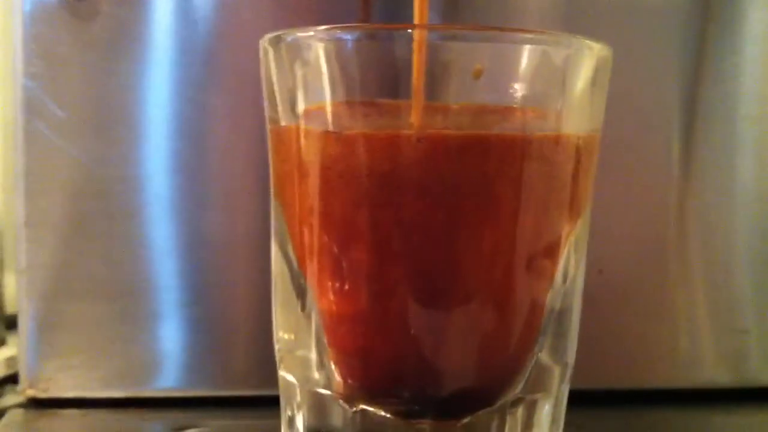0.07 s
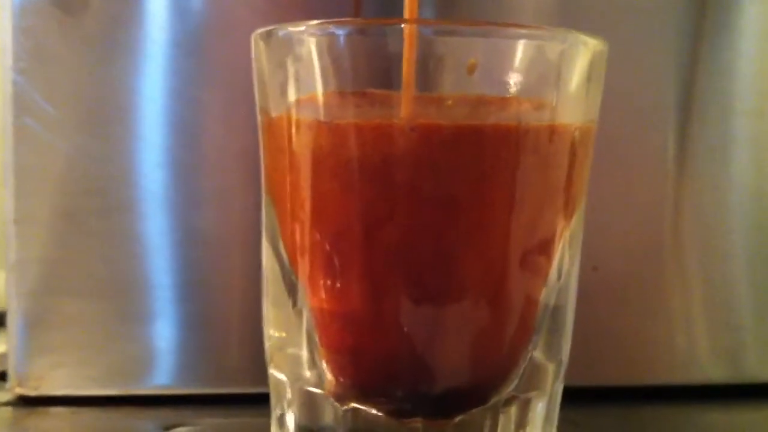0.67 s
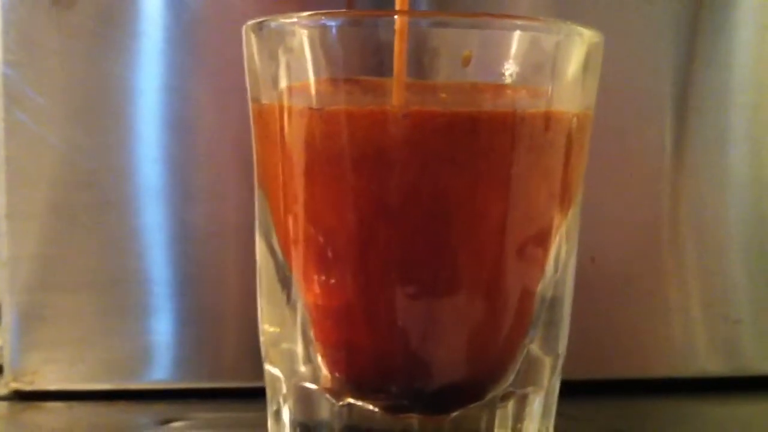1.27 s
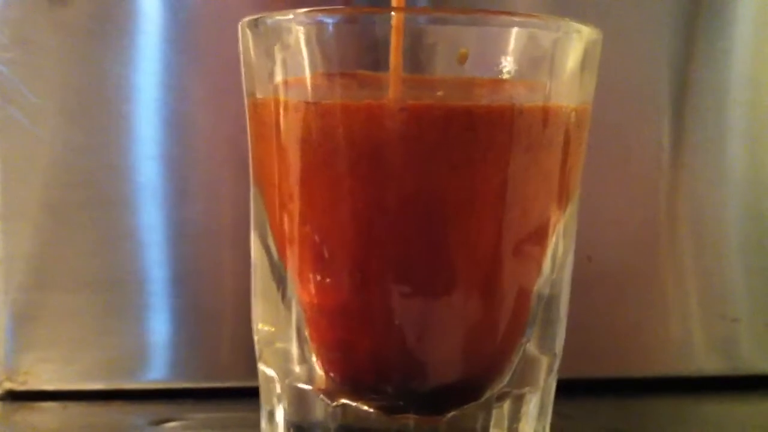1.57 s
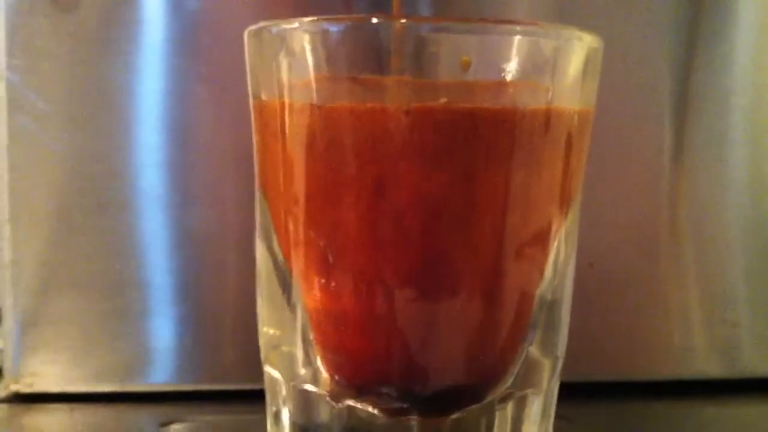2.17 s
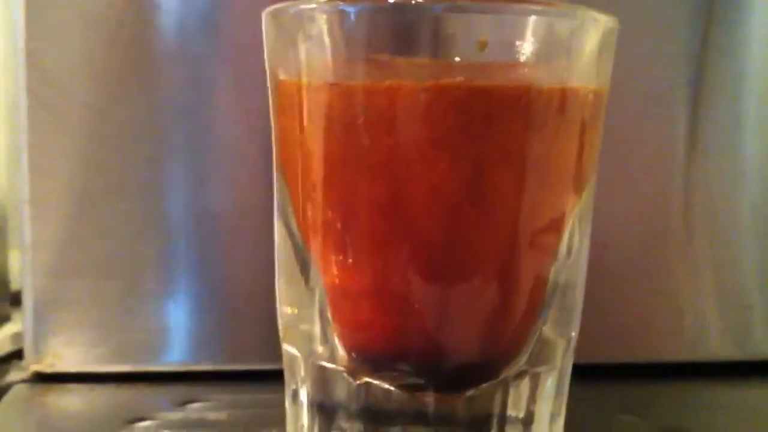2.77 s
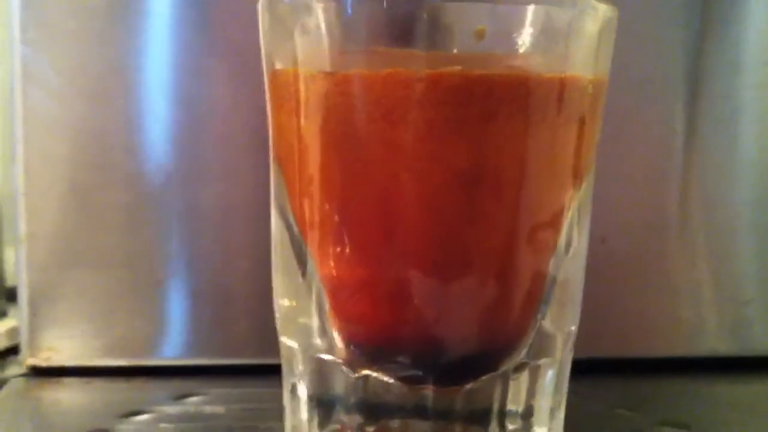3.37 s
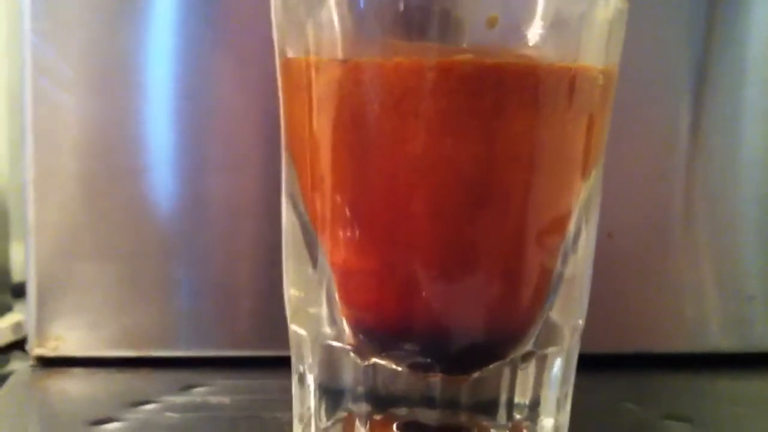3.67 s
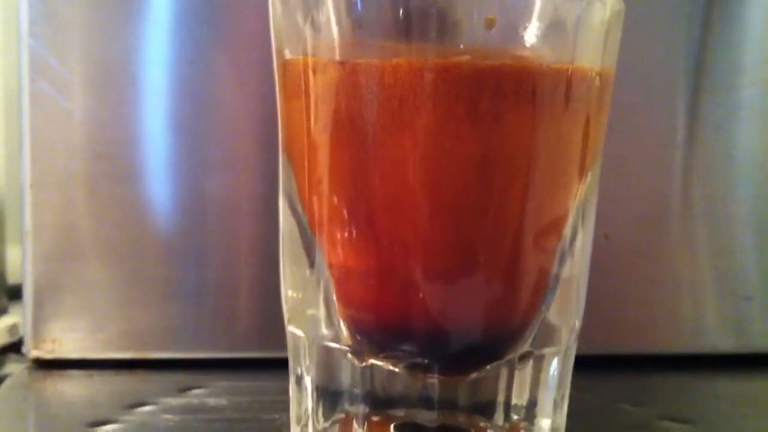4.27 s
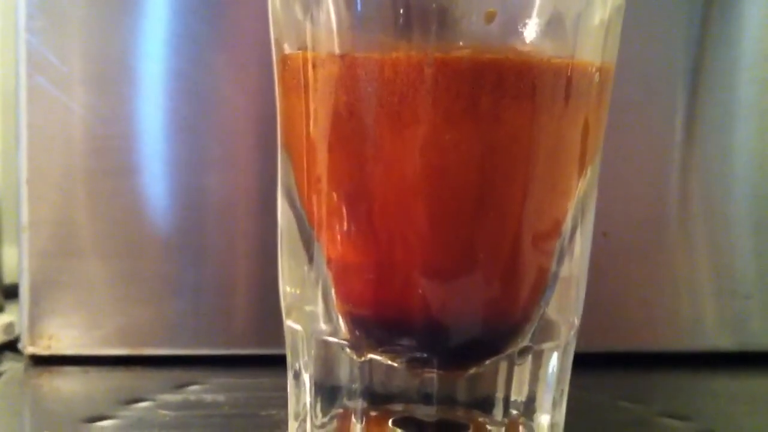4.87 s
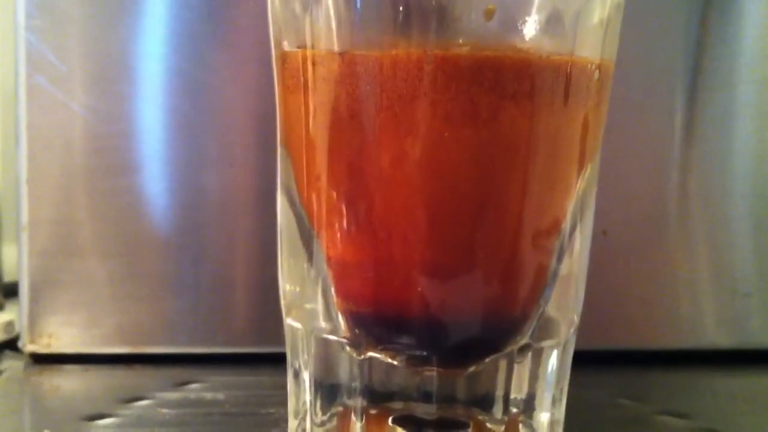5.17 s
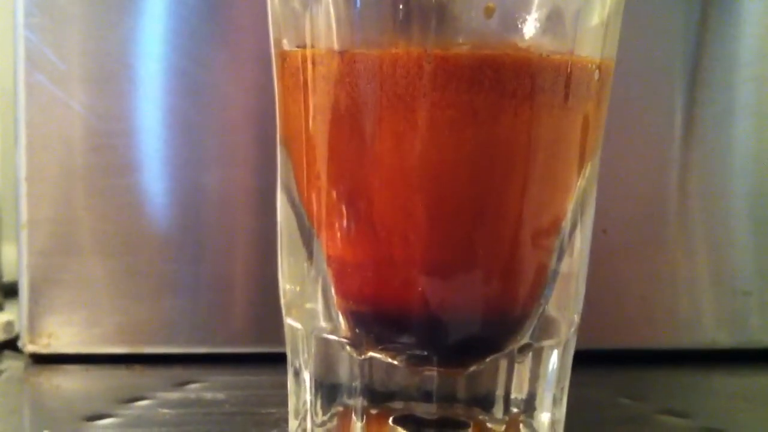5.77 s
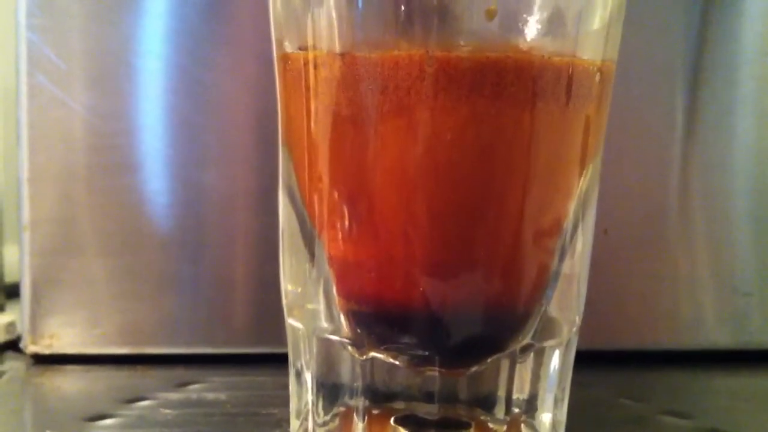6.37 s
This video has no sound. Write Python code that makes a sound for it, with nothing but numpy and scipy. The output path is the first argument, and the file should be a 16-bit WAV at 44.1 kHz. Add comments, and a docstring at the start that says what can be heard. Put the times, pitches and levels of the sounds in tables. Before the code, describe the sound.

An espresso machine pump hums and rattles loudly, then clunks off, leaving a thin hiss and a quiet kitchen drone.

```python
"""A loud, rattling hum comes first: an espresso machine's vibrating pump is filling a glass.
Its piston strokes at the mains rate, shaking the casing and loose parts and pushing water along.
The pump is switched off and a valve slams with a hard clunk. The trapped pressure hisses away and
spits once, and the resting machine gives a soft thump and a few ticks.
The small kitchen echoes the knocks, and an appliance drones quietly in it throughout."""
import sys
import numpy as np
from scipy import signal
from scipy.fft import rfft, irfft, next_fast_len
from scipy.io import wavfile
from scipy.ndimage import map_coordinates

SR = 44100
rng = np.random.default_rng(int(sys.argv[2]) if len(sys.argv) > 2 else 0)


def transcribe(u):
    """Save the signal u as a 16-bit wav file named by the first command-line argument.

    u: samples, shape (n,) or (channels, n), limited to [-1, 1]; the rate is SR.
    q: integer samples, one column per channel.
    """
    v = np.clip(np.atleast_2d(u).T, -1, 1)
    q = np.round(v * 32767).astype(np.int16)
    wavfile.write(sys.argv[1], SR, q)


N = 287091
T = np.arange(N) / SR
BLOW_T = T[:SR // 2]  # half a second, enough for one blow to ring

# A ring_s is the time to fade by 60 dB. A noise's shape_db only sets its colour, not its loudness.
# The kitchen's echo: pitch_hz, ring_s
ROOM_ECHO = [(100, .45), (400, .5), (1000, .42), (2500, .42), (4000, 0.34), (15000, 0.18)]
# The appliance's motor tones: pitch_hz, level_db
MOTOR_TONES = [(119.8, -74.5), (204, -78), (223, -68.5), (239.7, -59), (294.3, -72.5), (353.7, -76),
               (411.8, -76), (471.7, -68), (707.5, -77.5), (825.5, -78.5)]
# The air it moves: pitch_hz, shape_db
AIR_RUSH = [(25, -23), (80, -25.5), (140, -11), (190, -9.5), (210, 1.5), (260, -2), (330, -4.5), (470, 0.5),
            (560, -10), (780, -6.5), (950, -13.5), (1300, -15.5), (2000, -21.5), (8000, -27)]
# The resting machine's ticks: start_s, strength_db, brightness_db
TICK_TIMES = [(4.367, -53, -13), (4.457, -50, -19), (4.4944, -57, -12), (4.9182, -51.5, -9),
              (4.9796, -55, -14), (6.0045, -53, -1)]
# The tones in a tick: pitch_hz, strength_db, ring_s
TICK_TONES = [(1327, -4, .06), (1470, 1, 0.034), (1600, -1.5, 0.041)]
# The crack in a tick: pitch_hz, shape_db
TICK_NOISE = [(800, -20), (1500, -12), (2800, 14), (5000, -12), (16000, -22)]
# Leaking pressure: pitch_hz, shape_db
LEAK_HISS = [(600, -22), (1500, -10.5), (3000, -0.5), (4400, -4), (6000, 0.5), (8200, -3), (9400, 1),
             (11500, 1.5), (13000, -1.5), (14300, 2), (16000, -3.5)]
# A narrower sizzle: pitch_hz, shape_db
JET_SIZZLE = [(2000, -25), (5000, -13.5), (6000, 3.5), (7000, -7), (8300, -13.5), (9300, 4), (11000, -7),
              (12400, 2), (14000, -5), (16000, -6.5)]
# The vent's one spit: pitch_hz, shape_db
VENT_SPIT = [(800, -18), (1400, -7), (3000, -14), (7000, -3), (11000, 1), (13000, 4), (16000, -1)]
# A lower rush that builds just ahead of it: pitch_hz, shape_db
VENT_SWELL = [(800, -16), (1500, -4), (2800, -1), (5000, -1.5), (9000, -10)]
# The valve's slam and bounces: start_s, strength_db
VALVE_BLOWS = [(1.8172, -13), (1.8200, -16), (1.8250, -12.5), (1.8300, -20.5), (1.8372, -20)]
# A blow's bright part: pitch_hz, shape_db
VALVE_SNAP = [(300, -22), (1000, -10), (3500, -1.5), (5000, -1.5), (7700, -2), (9200, 4), (10400, -6),
              (12900, -5), (13900, 4), (14800, -3), (16000, -3.5)]
# A blow's dull part: pitch_hz, shape_db
VALVE_KNOCK = [(30, -20), (100, -21.5), (300, -5), (740, -1), (1220, -6.5), (1420, 7), (1850, -6.5),
               (2550, 7), (3200, -10), (3800, -7.5), (4500, -12), (16000, -34)]
# The struck casing's tones: pitch_hz, strength_db, ring_s
CASING_TONES = [(415, -22, .2), (673, -19, .12), (764, -17, .1), (1010, -12, .05), (1360, -10, .03),
                (1432, -5, .03), (1560, -9, .025), (1927, -11, .04), (2300, -9, .03), (2476, -12, .03),
                (2589, -12, .03), (2850, -11, .03), (3500, -7, .02), (3750, -7, .02)]
# The pump's hum: multiple_of_mains, level_db
PUMP_HUM = [(1, -74), (2, -59), (3, -39.5), (4, -50.5), (5, -44), (6, -47.5), (7, -35.5), (8, -55),
            (9, -51.5), (10, -50), (11, -51.5), (12, -50.5), (13, -56.5), (14, -61), (15, -58.5), (16, -48),
            (17, -54), (18, -48), (19, -49.5), (20, -46.5), (21, -68.5), (22, -56.5), (23, -63.5),
            (24, -53), (25, -57.5), (26, -55), (27, -59), (28, -56), (29, -71.5), (30, -72.5)]
# The casing's buzz above the hum, before the panels boost it: pitch_hz, level_db
CASING_BUZZ = [(1860, -58.5), (2220, -68), (2340, -49.5), (2520, -58.5), (2590, -79), (2700, -60.5),
               (2860, -92), (2940, -58.5), (3020, -83), (4000, -78), (5000, -80.5), (5800, -84.5),
               (6700, -69.5), (7600, -78.5), (16000, -87)]
# Ringing sheet metal panels: pitch_hz, boost_db
PANEL_BOOSTS = [(3240, 20), (3720, 4), (3900, 15.5), (4320, 10.5), (4620, 4.5), (4900, 8), (5040, 18),
                (6720, 10)]
# Water forced through the machine: pitch_hz, shape_db
WATER_FLOW = [(30, -43), (100, -30), (170, -21), (240, -16.5), (290, -6.5), (420, -12), (520, -9.5),
              (800, -20), (1000, -11), (1700, -22), (2300, -12.5), (2800, -21.5), (5800, -26.5),
              (16000, -32)]
# Loose metal parts: pitch_hz, shape_db
METAL_RATTLE = [(4000, -35), (5900, -20.5), (6400, -2), (6720, 5), (6830, -5), (7150, 3), (7500, 0),
                (7750, -1), (9000, -4), (11000, -6.5), (12300, -16.5), (13750, -9), (14200, -14.5),
                (16000, -17.5)]

MAINS_HZ, TOP_HZ = 59.992, 15850  # the piston's stroke rate; the highest pitch heard
STOP_S, THUMP_S, SPIT_S = 1.818, 2.4403, 2.82


def amp(db):
    """Turn decibels into a gain."""
    return 10 ** (np.asarray(db) / 20)


def unit(x):
    """Scale a signal to an average (rms) level of 1."""
    return x / np.sqrt(np.mean(x ** 2) + 1e-20)


def along(points, hz):
    """Read between a table's rows on a log pitch scale."""
    pitches, values = np.transpose(points)
    return np.interp(np.log(hz + 1), np.log(pitches + 1), values)


def wobble(per_s):
    """A smooth curve through per_s random values a second."""
    return map_coordinates(rng.standard_normal(int(N * per_s / SR) + 4), [T * per_s])


def filtered(x, response):
    """Turn each frequency up or down by response(hz)."""
    size = next_fast_len(N + SR // 2)
    return irfft(rfft(x, size) * response(np.fft.rfftfreq(size, 1 / SR)), size)[:N]


def noise(shape):
    """Noise at level 1, coloured by a table."""
    return unit(filtered(rng.standard_normal(N), lambda hz: amp(along(shape, hz))))


def decay(t, ring_s):
    """Silent before t = 0, then 60 dB quieter every ring_s."""
    return (t >= 0) * np.exp(-np.log(1000) * np.maximum(t, 0) / ring_s)


def fade_in(t, rise_s):
    """Climb from 0 toward 1 to soften a start."""
    return 1 - np.exp(-t / rise_s)


def add(track, start_s, sound):
    """Mix a sound into a track at start_s."""
    part = track[round(start_s * SR):][:len(sound)]
    part += sound[:len(part)]


def ring(tones, scatter_db):
    """A struck part rings with fading tones, their strengths new at each blow."""
    hz, db, ring_s = np.transpose(tones)[:, :, None]
    strength = amp(db + scatter_db * rng.standard_normal(hz.shape)) * rng.choice([-1, 1], hz.shape)
    return np.sum(strength * np.sin(2 * np.pi * hz * BLOW_T) * decay(BLOW_T, ring_s), axis=0)


def kitchen_echo(x):
    """The room answers a sound, each frequency dying at its own speed."""
    hz, t, spectrum = signal.stft(rng.standard_normal(SR), SR, nperseg=256)
    tail = signal.istft(spectrum * decay(t, along(ROOM_ECHO, hz)[:, None]), SR, nperseg=256)[1]
    tail *= fade_in(T[:len(tail)], .008)
    return signal.fftconvolve(x, tail / np.linalg.norm(tail))[:N]


def appliance():
    """A motor's slightly unsteady tones sit over the rush of its air."""
    tones = np.zeros(N)
    for hz, db in MOTOR_TONES:
        gain = np.sqrt(2) * amp(db + 1.7 * wobble(3))
        phase = .14 * wobble(1.923) + rng.uniform(0, 2 * np.pi)
        tones += gain * np.sin(2 * np.pi * hz * T + phase)
    return tones + amp(-60.5 + .6 * wobble(4.6)) * noise(AIR_RUSH)


def settling(thump_hz=276):
    """The resting machine gives one soft, low thump and a few small ticks."""
    knocks = np.zeros(N)
    thump = -amp(-20.5) * np.sin(2 * np.pi * thump_hz * BLOW_T) * decay(BLOW_T, ring_s=.016)
    add(knocks, THUMP_S, thump * fade_in(BLOW_T, .0031))
    crack = noise(TICK_NOISE)
    for start_s, db, bright_db in TICK_TIMES:
        add(knocks, start_s, amp(db - 6) * ring(TICK_TONES, scatter_db=3.5) * fade_in(BLOW_T, .0006))
        knocks += amp(db + bright_db - 5.5) * crack * decay(T - start_s, ring_s=.037)
    return knocks + amp(-10) * kitchen_echo(knocks)


def vent(leak_fall_db_per_s=2.5, jet_fall_db_per_s=5):
    """Trapped pressure leaks away as a thin hiss that swells and spits once."""
    since_stop = T - STOP_S
    leak = amp(-58 - leak_fall_db_per_s * since_stop + .3 * wobble(16)) * noise(LEAK_HISS)
    # the jet needs high pressure, so it dies sooner
    jet = amp(-60 - jet_fall_db_per_s * since_stop + .8 * wobble(2.7)) * noise(JET_SIZZLE)
    spit = amp(-51.5) * np.exp(-abs(T - SPIT_S) / .038) * noise(VENT_SPIT)
    swell = amp(-61.5) * np.exp(-abs(T - SPIT_S + .05) / .19) * noise(VENT_SWELL)
    return (leak + jet + spit + swell) * (since_stop > 0)


def valve_clunk(dulling_db=8):
    """The valve's plunger slides, slams and bounces, duller each time, and the casing rings."""
    casing = np.zeros(N)
    slam_s = VALVE_BLOWS[0][0]
    blows = amp(-16.5) * noise(VALVE_SNAP) * decay(slam_s - T, .017)  # a scrape grows into the slam
    for bounce, (start_s, db) in enumerate(VALVE_BLOWS):
        snap_db = .5 - dulling_db * np.sqrt(bounce)
        snap = amp(snap_db) * noise(VALVE_SNAP) * decay(T - start_s, ring_s=.018)
        knock = amp(-3) * noise(VALVE_KNOCK) * decay(T - start_s, ring_s=.038)
        blows += amp(db) * (snap + knock)
        add(casing, start_s, amp(db - 5) * ring(CASING_TONES, scatter_db=1) * fade_in(BLOW_T, .0003))
    return blows + casing + amp(-15) * kitchen_echo(blows)


def piston(size=4096):
    """Repeating strokes hum and buzz at multiples of the mains rate; the lowest ring on longest."""
    multiple = np.arange(1, int(TOP_HZ / MAINS_HZ))
    hz = multiple * MAINS_HZ
    # the panels favour some tones over others
    ripple_db = 2 * rng.standard_normal(len(hz)) * (hz > 3000)
    ripple_db += sum(boost * (abs(hz - pitch) < MAINS_HZ / 2) for pitch, boost in PANEL_BOOSTS)
    db = along(CASING_BUZZ, hz) + ripple_db
    db[:len(PUMP_HUM)] = np.transpose(PUMP_HUM)[1]
    cycle = np.arange(size) / size

    def bouncing(life_s):
        """A stroke bounces briefly around the casing, which sets each tone's phase."""
        return rfft(rng.standard_normal(size) * np.exp(-cycle / MAINS_HZ / life_s))[multiple]

    def repeat(tones):
        """Build one stroke from its tones and loop it."""
        stroke = irfft(np.append(0, tones), size) * size / 2
        return np.interp(T * MAINS_HZ % 1, cycle, stroke, period=1)

    soft_push = bouncing(.008)
    end_stop = bouncing(.003) * np.exp(2j * np.pi * hz * .003)  # a sharp hit, 3 ms before the push
    bounces = np.where(hz < 1800, soft_push, end_stop)
    tones = np.sqrt(2) * amp(db) * bounces / abs(bounces)
    since_stop = np.maximum(T - STOP_S, 0)
    low = multiple <= len(PUMP_HUM) // 4
    hum = repeat(tones * low) * decay(since_stop, ring_s=.36)
    buzz = repeat(tones * ~low) * decay(since_stop, ring_s=.09)
    return hum + buzz


def pump(flow_db=-43, rattle_db=-49, shake_db=3.5):
    """Each stroke drives the casing, pushes water and shakes loose parts by a different amount."""
    hum = piston() * amp(.2 * wobble(25))
    stroke_number, since_stroke = np.divmod(T + .003, 1 / MAINS_HZ)
    push = np.exp(-since_stroke / .008) * fade_in(since_stroke, .002)
    shakes = amp(shake_db * rng.standard_normal(int(stroke_number[-1]) + 1))
    jolt = push * shakes[stroke_number.astype(int)]
    flow = amp(flow_db) * noise(WATER_FLOW) * unit(1 + push)
    rattle = amp(rattle_db) * noise(METAL_RATTLE) * unit(.25 + jolt) * amp(.5 * wobble(6))
    return hum + (flow + rattle) * decay(np.maximum(T - STOP_S, 0), ring_s=.24)


def scene():
    """The machine and the appliance together, in one channel."""
    return (pump() + valve_clunk() + vent() + settling() + appliance())[None]


def record(dry, bass_hz=55):
    """Soften the deep bass and cut off the very highest treble."""
    return filtered(dry[0], lambda hz: hz ** 2 / np.sqrt(hz ** 4 + bass_hz ** 4) * (hz < TOP_HZ))[None]


dry = scene()
out = record(dry)
transcribe(out)
```